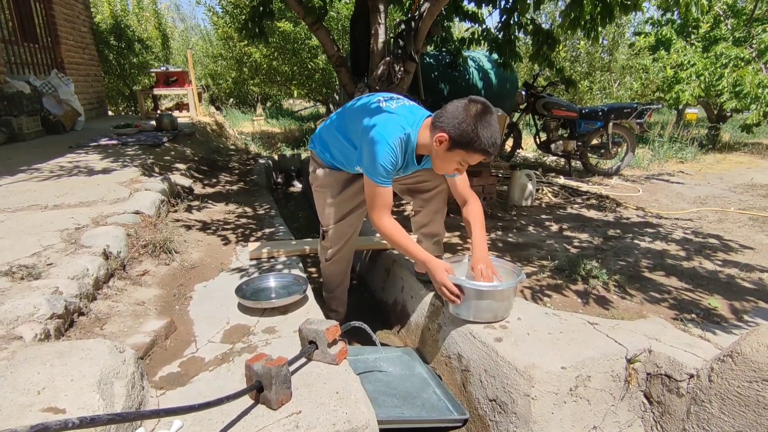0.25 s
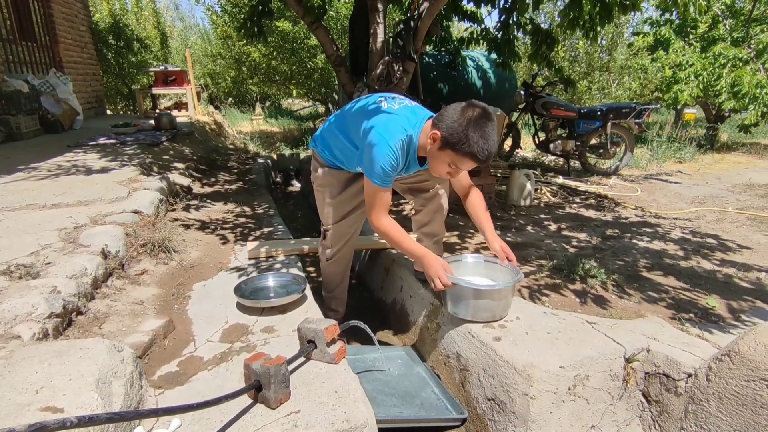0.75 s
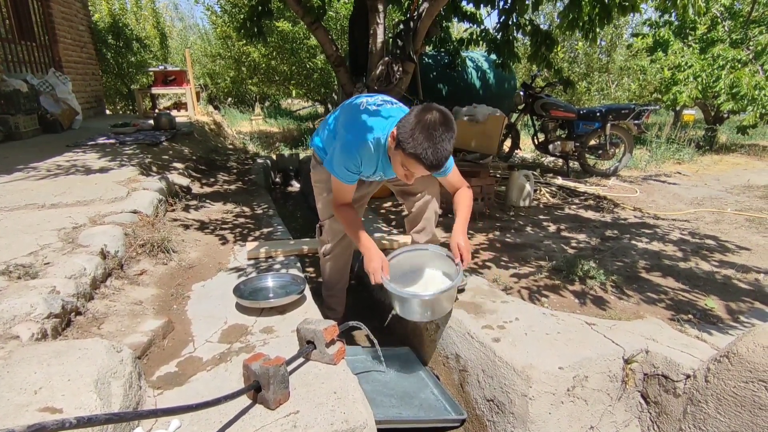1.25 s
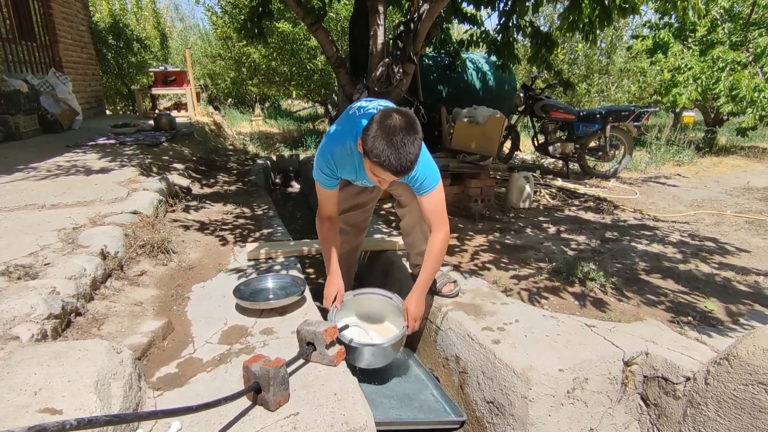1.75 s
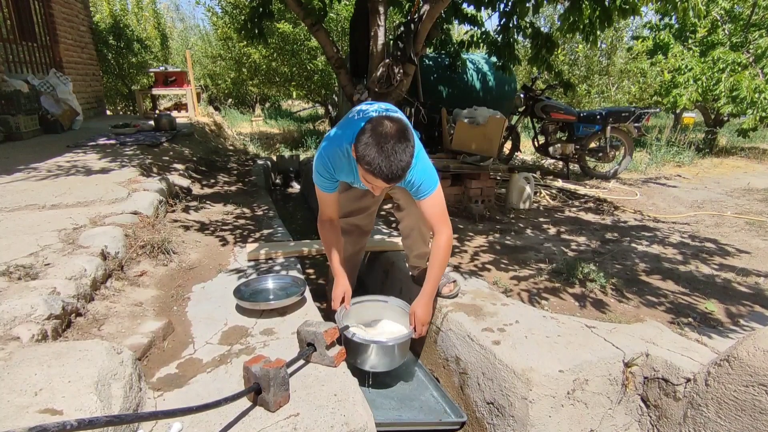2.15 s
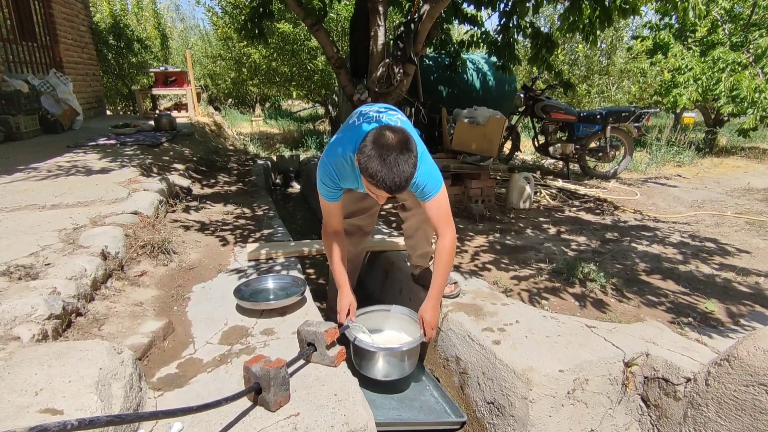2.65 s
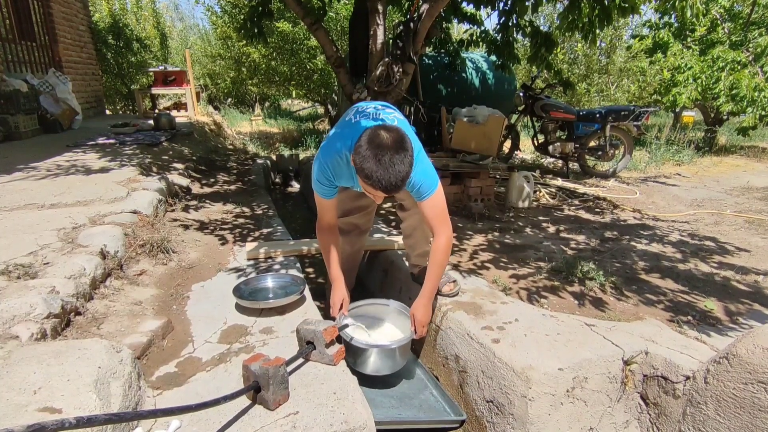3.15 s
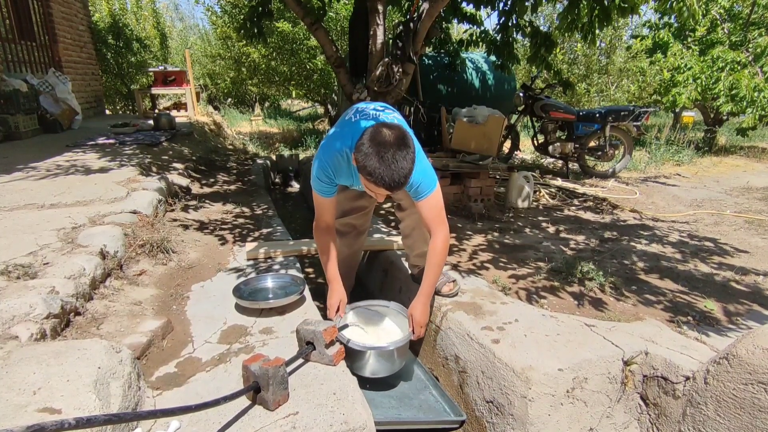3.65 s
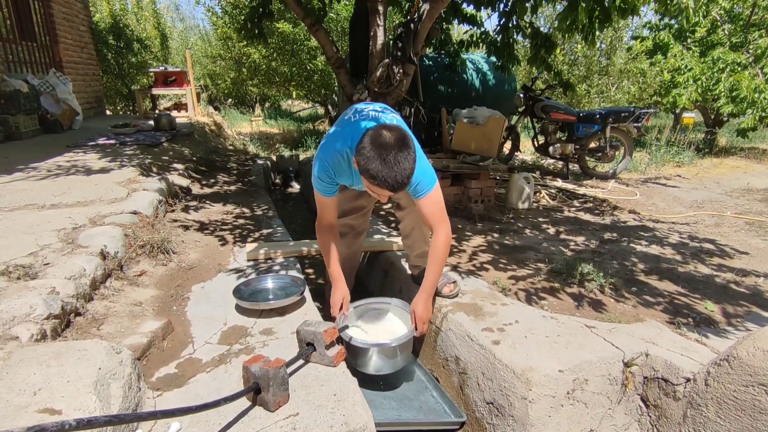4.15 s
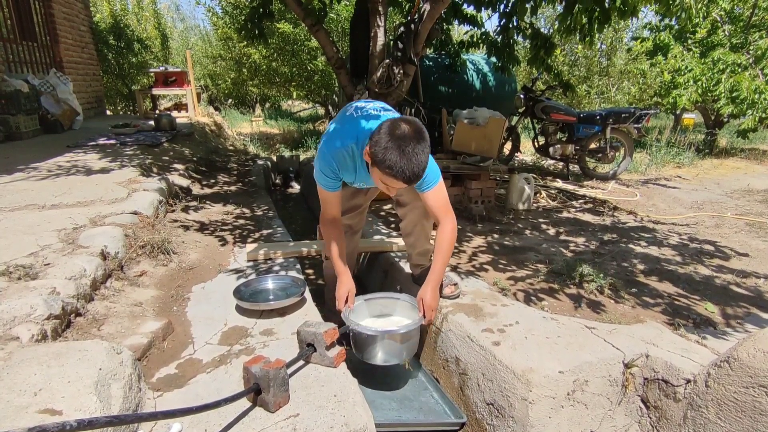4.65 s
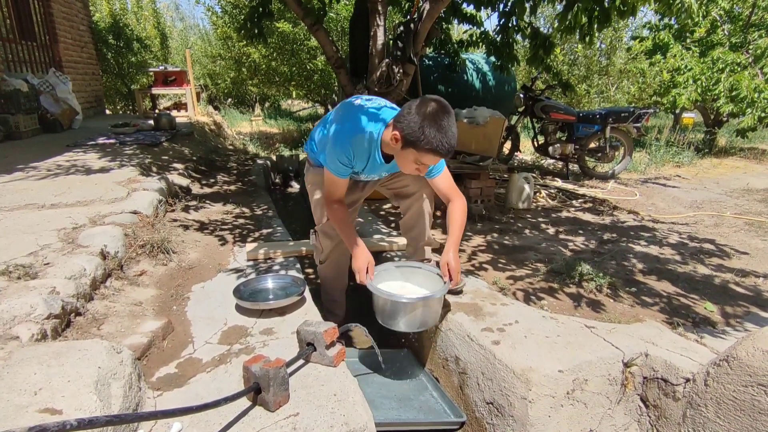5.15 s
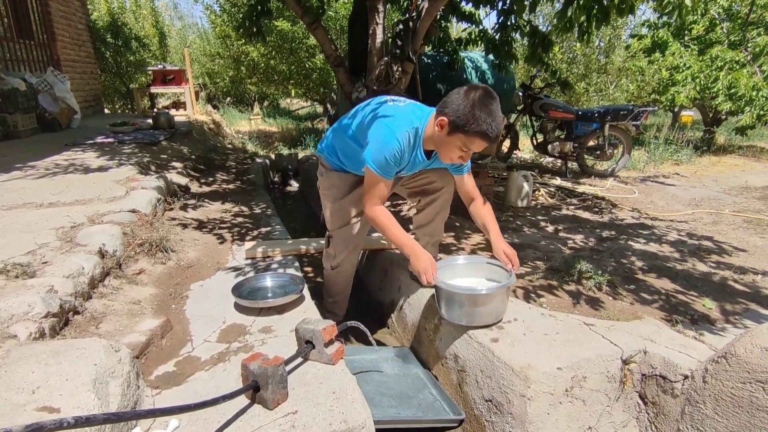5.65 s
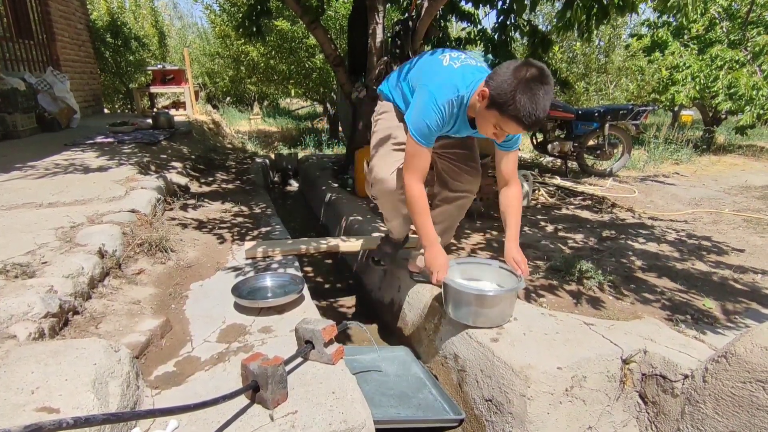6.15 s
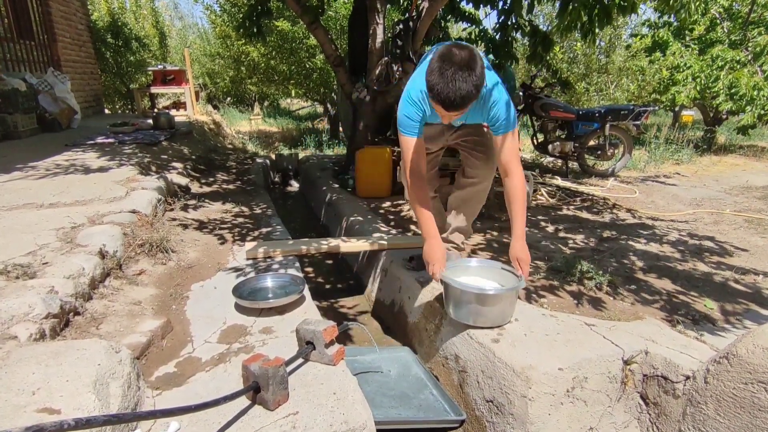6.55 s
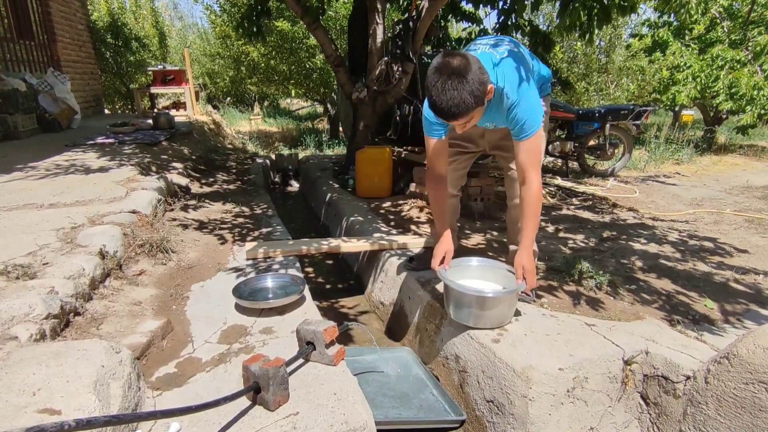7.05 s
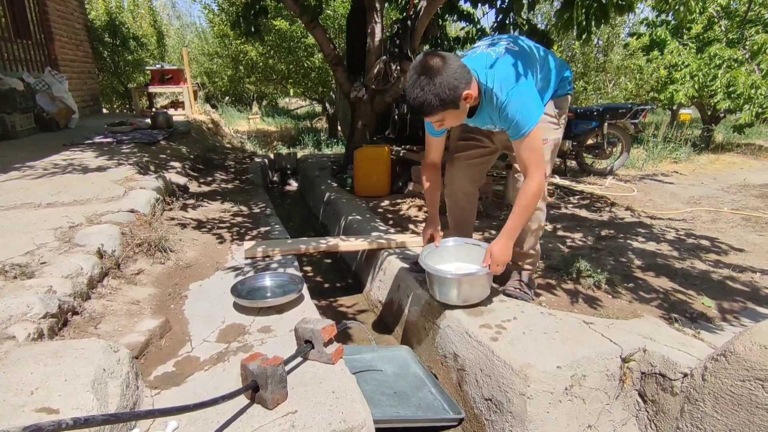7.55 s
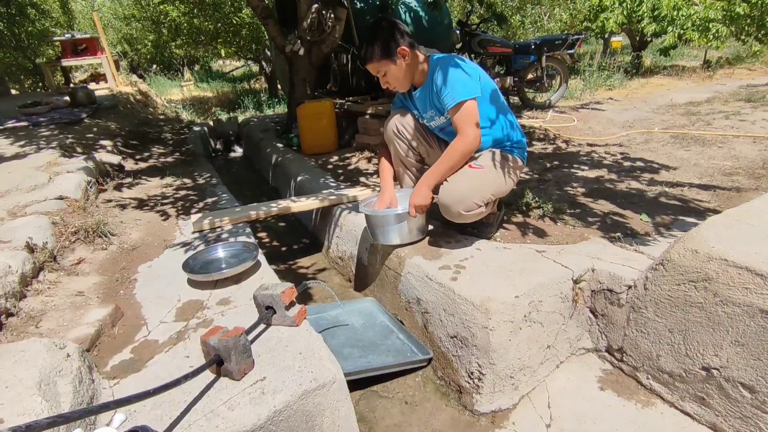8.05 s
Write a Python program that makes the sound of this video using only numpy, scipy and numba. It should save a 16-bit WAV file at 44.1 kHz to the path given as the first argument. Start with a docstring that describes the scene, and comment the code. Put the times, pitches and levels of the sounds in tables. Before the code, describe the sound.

From the start a hose stream splashes into a concrete ditch, a close, bright crackle with low gurgling, scattered splats and fine patter over a faint outdoor drone and hiss. Around 1.7 s the jet is cut for a moment as the pot's rim crosses it, then it falls into the metal pot, with gulps and a more hollow, bubbling tone. Until about 4.8 s it fills steadily, with small sloshes, plops and a rim tick near 3.4 s. The stream thins around 4.9 s, then sharp ticks and splashes at 5.2-5.7 s mark the pot leaving and water returning to the ditch. At 5.8 s the heavy pot scuffs onto stone with a short dull knock; ticks follow at 6.1 and 6.55 s. Water trickles on. At 7.8 s the sound nearly vanishes, then swells back under rumbling pops on the right, a dull left bump near 7.95 s and buffeting air until 8.3 s.

```python
"""Filling a pot under a hose

Outdoors, a hose runs into a concrete ditch while a metal pot of rice is rinsed, filled under the stream and set on stone.
The water is a shower of tiny noisy or ringing grains, with single splats, gulps, patter and sloshes; the pot is a few
damped modes with a scuff and rim ticks. Filtered noise makes the low drone and hiss behind it. Near the end the sound
drops out, then swells back under steps and rumbles on the right, a dull bump on the left and air buffeting the microphone.
"""
import sys
import numpy as np
from scipy import signal
from scipy.fft import rfft, irfft, next_fast_len
from scipy.io import wavfile
from scipy.ndimage import uniform_filter1d
from numba import njit

SR = 44100
rng = np.random.default_rng(int(sys.argv[2]) if len(sys.argv) > 2 else 0)


def unload_audio(sound):
    """Save the sound as a 16-bit wav file, at the path given as the first command line argument."""
    columns = np.transpose(np.atleast_2d(sound))
    # keep every value between -1 and 1, then stretch to whole-number steps
    steps = np.round(np.clip(columns, -1, 1) * 32767)
    wavfile.write(sys.argv[1], SR, steps.astype(np.int16))


N = 365588
TIME = np.arange(N) / SR
TOP_HZ = 14400  # upper edge of the sound


def undb(db):
    """Decibels to gain."""
    return 10 ** (np.asarray(db) / 20)


def curve(rows, axis=1):
    """One column of a table, joined by straight lines in time."""
    rows = np.array(rows)
    return np.interp(TIME, rows[:, 0], rows[:, axis])


def level(x, db):
    """Scale to an rms level."""
    return x * undb(db) / np.sqrt(np.mean(x ** 2))


def fade(t, t60):
    """Exponential ring-down, 60 dB in t60 seconds."""
    return np.exp(-np.log(1000) * t / max(t60, 1e-3))


def add(out, start_s, x):
    """Mix a short sound in at its start time."""
    i = int(start_s * SR)
    out[..., i:i + x.shape[-1]] += x[..., :N - i]


def wander(rate):
    """Random levels, so many a second, smoothly joined."""
    hold = int(SR / rate)
    steps = np.repeat(rng.standard_normal(N // hold + 1), hold)
    return uniform_filter1d(steps, hold)[:N]


def tint(x, colour, modes=()):
    """Filter by a smooth spectrum with resonant bumps on it."""
    size = next_fast_len(x.shape[-1], True)
    f = np.maximum(np.fft.rfftfreq(size, 1 / SR), 1)
    hz, db = np.transpose(colour)
    gain_db = np.interp(np.log(f), np.log(hz), db)
    for centre, width, lift in modes:
        gain_db = gain_db + lift / (1 + (2 * (f - centre) / width) ** 2)
    return irfft(rfft(x, size) * undb(gain_db), size)[..., :x.shape[-1]]


def band(x, lo_hz, hi_hz):
    """Band-pass."""
    edges = [lo_hz, min(hi_hz, SR / 2 - 1000)]
    return signal.sosfilt(signal.butter(2, edges, "band", fs=SR, output="sos"), x)


@njit
def ring(starts, hz, cycles, size, rise):
    """Damped sines that die after so many cycles; a positive rise glides them up as the bubble nears the surface."""
    out = np.zeros(N)
    for k in range(len(starts)):
        length = int(cycles[k] * SR / hz[k]) + 2
        first = int(starts[k] * SR)
        turn = 2 * np.pi * hz[k] / SR
        phasor = size[k] + 0j
        step = np.exp(1j * turn - 6.9 / length)
        glide = np.exp(1j * turn * rise / length)
        for i in range(first, min(first + length, N)):
            phasor *= step
            step *= glide
            out[i] += phasor.imag
    return out


def grains(count, lo_hz, hi_hz, cycles, spread_db, rise):
    """A random shower of ringing grains over a pitch range, the higher ones stronger, with a random spread of sizes."""
    when, pitch, strength, damping = rng.random((count, 4)).T
    hz = lo_hz * (hi_hz / lo_hz) ** pitch
    size = hz * undb(-spread_db * np.log(np.maximum(strength, .01)))
    return level(ring(when * N / SR, hz, cycles * (.5 + damping), size, rise), 0)


def droplets(size, spread_db):
    """Two channels of grainy noise: the strength jumps with every tiny droplet."""
    hold = SR // 2000
    strength = np.clip(rng.standard_normal((2, size // hold + 1)), -2, 2)
    grain = np.repeat(undb(spread_db * strength), hold, axis=1)[:, :size]
    return rng.standard_normal((2, size)) * grain


# Hollow resonances of the ditch. Each row: centre in Hz, width in Hz, full lift in dB.
DITCH_RESONANCES = [(394, 69, 9.5), (731, 183, 12), (890.5, 39, 11.5), (1620, 72, 7.5), (2083, 135, 9),
                    (2595, 400, 7.5), (3180, 75, 7), (5340, 840, 10), (5875, 300, 7.5)]


def hollow(x, share):
    """Lend a sound a share of the ditch's resonances."""
    flat = [(1, 0)]
    return tint(x, flat, [(hz, width, share * lift) for hz, width, lift in DITCH_RESONANCES])


def surroundings(x, wet_db=-2, t60=.09, far_db=-15, far_t60=0.2, shared_hz=850):
    """Concrete close by scatters the sound; the lows reach both ports alike, the highs do not."""
    t = TIME[:SR // 5]
    scatter = rng.standard_normal((3, len(t)))
    low = signal.sosfilt(signal.butter(4, shared_hz, fs=SR, output="sos"), scatter[2])
    high = signal.sosfilt(signal.butter(4, shared_hz, "high", fs=SR, output="sos"), scatter[:2])
    near, far = fade(t, t60), fade(t, far_t60)
    decay = undb(wet_db) * near / np.linalg.norm(near) + undb(far_db) * far / np.linalg.norm(far)
    echo = (low + high) * decay
    # the direct sound reaches the right port first, the left six samples later
    echo[1, 0] += 1
    echo[0, 6] += 1
    return signal.oaconvolve(x[None], echo / np.linalg.norm(echo[0]), axes=1)[:, :N]


# Steady outdoor background. Each row: frequency in Hz, relative level in dB.
AIR_COLOUR = [(20, -0.5), (35, 3), (80, -3.5), (115, -8.5), (200, -14), (400, -4.5), (1000, -35.5),
              (3000, -17.5), (6000, -17), (10000, -28.5), (14500, -26.5)]
# Its drone. Each row: centre in Hz, width in Hz, lift in dB.
DRONE_BUMPS = [(45.1, 1.5, 4.7), (77.9, 27, 7.8), (156.7, 23, 6.8)]
# Air buffeting the microphone. Each row: frequency in Hz, relative level in dB.
BUFFET_COLOUR = [(10, 7), (40, 0), (70, 5), (130, -15), (300, -30), (800, -37), (4000, -80)]


def air(air_db=-55, side_db=-8, buffet_db=-43):
    """Noise shaped into a distant drone under a smooth hiss; gusts buffet the ports from the first pop on."""
    mid, side = rng.standard_normal((2, N))
    # the lows are narrower than the highs
    side = tint(side, [(300, side_db), (1500, 0)])
    steady = tint(np.array([mid + side, mid - side]), AIR_COLOUR, DRONE_BUMPS)
    gusts = level(tint(rng.standard_normal((2, N)), BUFFET_COLOUR), buffet_db)
    return level(steady, air_db) + gusts * (TIME > ZERO_LINE_POPS[0][0])


# Slow sag of the right channel's zero line. Each row: time in seconds, offset in full-scale units.
ZERO_LINE_SAG = [(7.8, 0), (7.87, -.34), (7.94, -.46), (8.05, -.43), (8.2, -.22), (8.29, -.13)]
# Pops, sudden jumps of that line. Each row: start in seconds, step in full-scale units, rise in ms,
# settling in seconds, starting level of the rumble in dB against the step.
ZERO_LINE_POPS = [(7.7998, -0.064, .02, 0.039, -14), (7.8787, .14, 0.0088, .05, -21.5),
                  (7.942, 0.16, 0.016, 0.024, -17.5), (8.0007, 0.1, 0.02, .05, -10.5),
                  (8.0614, 0.049, 0.044, .035, -31)]
# The rumble after a pop. Each row: frequency in Hz, relative level in dB.
RUMBLE_COLOUR = [(10, -6), (40, 0.5), (70, 3), (130, -7), (300, -17.5), (600, -28), (1200, -40),
                 (4000, -72)]


def thump(rumble_t60=0.2, bump_s=7.953, bump_hz=200, bump_db=-36, bump_t60=0.072):
    """The right zero line sags and jumps in steps, each a pop with a rumble after it; a dull bump sounds on the left."""
    left, right, t = np.zeros(N), curve(ZERO_LINE_SAG), TIME[:SR // 2]
    for start_s, step, rise_ms, settle_s, rumble_db in ZERO_LINE_POPS:
        noise = tint(rng.standard_normal(len(t)), RUMBLE_COLOUR)
        rumble = level(noise, rumble_db) * fade(t, rumble_t60)
        front = 1 - np.exp(-t * 1000 / max(rise_ms, .005))
        add(right, start_s, step * front * (np.exp(-t / settle_s) + rumble))
    tone = np.sin(2 * np.pi * bump_hz * t)
    attack = np.minimum(t * bump_hz, 1)
    add(left, bump_s, undb(bump_db) * tone * attack * fade(t, bump_t60))
    return np.array([left, right])


# The filled pot meeting the ledge. Each row: mode in Hz, relative level in dB, t60 in seconds.
POT_BODY = [(274, -6, 0.03), (553, 1.5, 0.058), (790, 7, 0.013), (1036, 0, 0.04), (1310, -10, 0.022)]
# Sharp ticks on the pot's rim. Each row: start in seconds, peak on the right in dB, lowest frequency in Hz.
TICKS = [(3.409, -27, 300), (5.168, -22.5, 450), (5.2453, -23, 2960), (6.087, -23, 2480),
         (6.554, -30, 1500)]


def pot(knock_s=5.7935, knock_db=-30, scuff_t60=0.075, grit_db=-2, rub_db=-6, contact_s=0.0032):
    """The rim ticks as the pot is handled; damped by its water, it scuffs down on the stone with a dull knock."""
    knock, tick, t = np.zeros(N), np.zeros(N), TIME[:SR // 5]
    body = sum(undb(db) * np.sin(2 * np.pi * hz * t) * fade(t, t60) for hz, db, t60 in POT_BODY)
    scuff = rng.standard_normal(len(t)) * fade(t, scuff_t60)
    # the scuff also sets the pot's own modes ringing
    rubbed = band(signal.fftconvolve(scuff, body)[:len(t)], 230, 4000)
    blow = level(body * (1 - np.exp(-t / contact_s)), 0)
    blow = blow + level(rubbed, rub_db) + level(band(scuff, 260, 1330), grit_db)
    add(knock, knock_s, blow / abs(blow).max() * undb(knock_db))
    for start_s, db, lowest_hz in TICKS:
        snap = band(fade(t, .0002), lowest_hz, 14300)
        add(tick, start_s, snap / abs(snap).max() * undb(db))
    # the ticks are weaker on the left
    return surroundings(knock, wet_db=-12, t60=0.29) + tick * undb([[-9], [0]])


# Water sloshing in the moving pot. Each row: start in seconds, length before the release in seconds,
# bubble level in dB and wash level in dB, both before trim, wash's first pitch in Hz, its spread in octaves.
SLOSH_WAVES = [(1.81, 0.08, -58.5, -52, 1960, 0.59), (1.969, 0.045, -60, -56, 1050, 0.33),
               (2.505, 0.053, -60, -55.5, 2420, 0.41), (2.976, 0.157, -80, -52, 2970, 0.18),
               (3.358, 0.023, -57, -63, 1500, 0.59), (3.535, 0.058, -64, -54.5, 2310, 0.24),
               (3.684, 0.058, -57, -52.5, 2430, 0.2), (3.92, .04, -59, -69, 2380, 0.47),
               (4.058, 0.17, -77, -52, 4040, 0.74), (4.289, .06, -67, -59, 1200, 0.4),
               (4.767, 0.023, -80, -45.5, 3300, 0.83), (4.951, 0.038, -61, -54.5, 2030, 0.95),
               (5.347, 0.045, -58, -58, 1020, 0.67), (5.452, 0.143, -58, -59, 1110, 0.52),
               (5.739, .045, -57, -55, 2500, 0.34), (5.848, 0.02, -55, -51, 1000, 0.36)]
SLOSH_ATTACK_S, SLOSH_RELEASE_T60_S = 0.0053, 0.074


def sloshes(bubble_db=-2, wash_db=-1, wash_cycles=30, spread_db=5, fall_octaves_per_s=4):
    """A wave runs up the pot's wall: it folds bubbles under and breaks in a grainy wash that sinks in pitch."""
    folding, breaking = np.zeros(N), np.zeros(N)
    t = TIME[:SR // 3]
    for start_s, length, low_db, high_db, hz, octaves in SLOSH_WAVES:
        attack = np.minimum(t / max(SLOSH_ATTACK_S, 1e-3), 1)
        shape = attack * fade(np.maximum(t - length, 0), SLOSH_RELEASE_T60_S)
        add(folding, start_s, shape * undb(low_db))
        when = t[-1] * rng.random(size=400)
        pitch, strength = rng.standard_normal((2, len(when)))
        droplet_hz = np.minimum(hz * 2 ** (octaves * pitch - fall_octaves_per_s * when), TOP_HZ)
        size = np.sqrt(droplet_hz / hz) * undb(spread_db * np.tanh(strength))
        wash = ring(when, droplet_hz, np.full(len(when), float(wash_cycles)), size, 0.)
        add(breaking, start_s, shape * level(wash[:len(t)], high_db + wash_db))
    bubbles = grains(count=1300, lo_hz=300, hi_hz=1140, cycles=27, spread_db=-1.5, rise=0.1)
    folded = folding * level(tint(bubbles, POT_WATER_COLOUR, POT_RESONANCES), bubble_db)
    return surroundings(folded + breaking, wet_db=3.0, t60=0.069)


# Pockets of air closing under water. Each row: start in seconds, size in dB before trim,
# starting pitch in Hz, t60 in seconds.
AIR_POCKETS = [(.482, -46, 707, .035), (1.263, -46, 1120, .04), (1.815, -50.5, 450, 0.12),
               (1.823, -40, 1810, .03), (1.878, -47, 740, 0.042), (1.972, -56, 760, .025),
               (1.985, -46.5, 880, 0.036), (2.082, -52, 656, 0.036), (2.143, -48, 625, 0.039),
               (3.055, -50, 2050, .025), (3.072, -45, 1770, 0.035), (3.279, -60, 330, 0.026),
               (3.321, -44, 363, 0.043), (3.359, -44.5, 1780, .035), (3.372, -49, 420, 0.028),
               (3.752, -49, 430, .04), (3.977, -50, 795, .03), (4.196, -53, 1760, .035),
               (4.234, -49, 640, 0.02), (4.242, -44, 1760, 0.041), (4.275, -51, 410, 0.052),
               (4.314, -47.5, 711, 0.069), (4.334, -50.5, 675, .03), (4.359, -53, 477, 0.11),
               (5.353, -47, 424, .06), (5.377, -49, 373, 0.099), (5.462, -44.5, 1010, .03),
               (5.483, -44, 1500, 0.035), (5.543, -49, 860, 0.09), (6.227, -53, 780, .04),
               (6.597, -39, 1410, 0.023), (6.676, -46, 762, 0.036)]


def gulps(gain_db=4, rise=0.1, brood_db=-10, brood_s=0.026, brood_cycles=9):
    """One large bubble rings and breaks up into a brood of short-lived others."""
    start_s, db, hz, t60 = np.transpose(AIR_POCKETS)
    out = ring(start_s, hz, hz * t60, undb(db), rise)
    delay, pitch = rng.random((len(start_s), 7, 2)).T  # seven in each brood
    cycles = np.full(len(start_s), float(brood_cycles))
    for lag, ratio in zip(delay, 2 ** (1.6 * pitch - .5)):
        out += ring(start_s + brood_s * lag ** 2, hz * ratio, cycles, undb(db + brood_db), rise)
    return surroundings(out * undb(gain_db), wet_db=-3.0, t60=0.036)


# Single drops slapping down. Each row: start in seconds, level in dB before panning, centre in Hz,
# t60 in seconds, spread either side in octaves.
SPLAT_DROPS = [(0.037, -40.5, 5370, 0.018, 0.56), (0.19, -41, 1600, 0.054, 0.22),
               (.303, -47, 1870, 0.14, 0.57), (0.3568, -35, 5200, 0.027, 0.085),
               (.39, -36.5, 5570, 0.032, 0.35), (0.7024, -39, 3100, 0.05, .3), (0.771, -43, 2180, 0.05, .2),
               (0.833, -45, 6400, .025, .35), (.87, -44, 5070, .02, 0.15), (0.928, -40.5, 3150, 0.071, .2),
               (.966, -41, 2600, 0.075, 1), (1.012, -42.5, 2110, .025, 0.37),
               (1.1764, -38.5, 5840, 0.028, 0.43), (1.221, -44, 2500, 0.043, 0.4),
               (1.312, -44, 2280, .03, 0.17), (1.403, -55, 1500, .04, .6), (1.449, -51, 4600, .03, .5),
               (1.749, -43, 5740, .025, 0.13), (1.971, -45, 5800, 0.015, 0.43),
               (2.107, -50, 4200, 0.056, .9), (2.186, -46.5, 2140, 0.045, 0.48),
               (2.301, -46, 2080, .035, 0.24), (2.364, -49.5, 1510, 0.038, 0.36),
               (2.53, -47, 2540, .03, 0.55), (2.967, -47, 2820, .035, .15), (2.985, -47, 4220, .025, 0.11),
               (3.401, -49, 1360, .03, 0.59), (3.927, -47, 1860, .035, .55),
               (3.945, -45, 4620, 0.018, 0.13), (4.918, -42, 6030, 0.0071, 0.72),
               (5.076, -43, 5400, .022, 0.42), (5.197, -36, 4960, 0.015, 0.15),
               (5.212, -43, 3400, 0.014, 0.4), (5.246, -38.5, 1594, 0.053, 0.25),
               (5.314, -42, 4300, 0.046, 0.5), (5.322, -40, 3060, 0.058, .25),
               (5.407, -45.5, 6800, .025, 0.24), (5.427, -34.5, 3650, 0.039, 0.51),
               (5.61, -42, 5600, 0.044, 0.63), (5.648, -43, 6130, .03, 0.4),
               (5.714, -32, 3190, 0.028, 0.54), (5.744, -42, 2420, .035, 0.18),
               (6.086, -28.5, 5870, 0.021, 0.35), (6.19, -50, 2250, .035, .2),
               (6.279, -50, 1720, 0.039, .5), (6.445, -43, 3180, .025, 0.24),
               (6.555, -42, 4430, .035, 0.81), (6.615, -41, 3900, 0.067, 0.72), (6.698, -45, 5500, .03, .3),
               (6.725, -54, 3500, .03, 1.1), (6.822, -47, 5200, .05, .45),
               (7.0205, -37, 6000, 0.0086, 0.49), (7.28, -45, 2330, 0.054, .25),
               (7.293, -41, 3200, 0.027, 0.54), (7.3505, -43, 2580, 0.042, 1.3),
               (7.42, -35, 6500, 0.029, 0.51), (7.479, -48, 2300, .03, .25), (7.552, -45, 2800, .035, .8),
               (7.564, -41.5, 1880, .05, 0.85), (7.62, -44, 5100, 0.024, 0.32),
               (7.715, -45, 3280, .04, 1.3), (7.917, -39, 5200, 0.027, 0.35)]
# bright drops land further left, low ones further right
SPLAT_HZ, SPLAT_PAN_DB_PER_OCTAVE = 3600, 1.5
SPLAT_GRAIN_DB = 4


def splats(gain_db=0, spatter_db=-22, spatter_t60=0.37, skirt_db=-17, ping_db=-1, ping_cycles=45,
           bounce_s=0.0036, bounce_db=-7, hollow_share=0.75):
    """Each drop slaps down on water or wet concrete, pings a tiny bubble and throws a short spatter of droplets."""
    out, t = np.zeros((2, N)), TIME[:SR // 6]
    attack = 1 - np.exp(-t / .0005)
    for start_s, db, hz, t60, octaves in SPLAT_DROPS:
        breadth = 2 ** max(octaves, .1)
        pan_db = SPLAT_PAN_DB_PER_OCTAVE * np.log2(hz / SPLAT_HZ)
        gain = undb(db + gain_db + np.array([[pan_db], [-pan_db]]) / 2)
        noise = hollow(droplets(len(t), SPLAT_GRAIN_DB), hollow_share)
        shape = attack * (fade(t, t60) + undb(spatter_db) * fade(t, spatter_t60))
        core = level(band(noise, hz / breadth, hz * breadth), 0)
        slap = shape * (core + level(band(noise, 1100, 4600), skirt_db))
        # the drop's energy is set by its size, whatever its fine grain
        slap = slap * np.linalg.norm(shape / shape.max()) / np.linalg.norm(slap, axis=1, keepdims=True)
        ping = undb(ping_db) * np.sin(2 * np.pi * hz * t) * fade(t, ping_cycles / hz)
        add(out, start_s, gain * (slap + ping))
        # the ditch wall throws the ping back
        add(out, start_s + bounce_s, gain * ping * undb(bounce_db))
    return out


# Small pattering drops. Each row: centre in Hz, level in dB against the spray curve, before trim.
PATTER_BANDS = [(1000, -13), (1550, -8), (2300, -5), (3200, -8), (5600, -12)]


def patter(breadth=1.296, per_s=17, t60=0.049, spread_db=4.0, in_pot_db=-7, grain_db=3.5,
           hollow_share=0.57, gain_db=-1):
    """Small drops break off the jet and patter down in the ditch in short gritty bursts; the pot catches most of them."""
    out, t, count = np.zeros((2, N)), TIME[:SR // 8], int(per_s * N / SR)
    breadth = max(breadth, 1.1)
    grit = hollow(droplets(N, grain_db), hollow_share)
    for hz, db in PATTER_BANDS:
        slip, strength = rng.random((count, 2)).T
        # the jet sheds drops at a fairly even rate, so they seldom pile up
        when = (np.arange(count) + slip) / count
        energy = undb(spread_db * (2 * strength - 1)) ** 2
        hits = np.bincount((when * N).astype(int), energy, N)
        bursts = np.sqrt(abs(signal.oaconvolve(hits, fade(t, t60) ** 2)[:N]))
        out += level(bursts * band(grit, hz / breadth, hz * breadth), db + gain_db)
    return out * undb(curve(STREAM_FLOW, axis=1) + in_pot_db * curve(STREAM_AIM))


# The stream, with a lull each time the pot's rim crosses it. Each row: time in seconds,
# spray level in dB and gurgle level in dB, both before trim and colour.
STREAM_FLOW = [(0, -57.5, -55), (0.85, -55.5, -61), (1.4, -58.5, -53.5), (1.675, -54, -67),
               (1.70, -65.5, -79), (1.79, -54.5, -78), (1.87, -55.5, -54.5), (2.23, -53.5, -59.5),
               (2.45, -57, -58), (3.2, -55, -56.5), (4.1, -56, -52.5), (4.68, -58, -54.5),
               (4.88, -64.5, -73), (5.0, -61.5, -62), (5.21, -59, -71), (5.3, -55, -65), (5.58, -55, -56.5),
               (5.98, -57.5, -63.5), (6.2, -56.5, -59.5), (7.6, -56.5, -57.5), (8.29, -59.5, -62)]
# Where the stream lands. Each row: time in seconds, share that falls into the pot from 0 to 1.
STREAM_AIM = [(1.66, 0), (1.8, 1), (4.8, 1), (5.2, .4), (5.4, 0)]
# Colour of the water in the ditch, then in the pot. Each row: frequency in Hz, gain in dB.
DITCH_WATER_COLOUR = [(150, -8), (300, -3.5), (550, -13.5), (1100, -2.5), (2400, 1.5), (4000, -0.5),
                      (6000, -7), (8000, -1), (10500, -5.5), (14500, -9)]
POT_WATER_COLOUR = [(150, -9), (300, -9), (550, -19.5), (1250, -7.5), (2400, -2.5), (4000, -6.5),
                    (6000, -10), (8000, -6.5), (10500, -8), (14500, -12)]
# Hollow resonances of the pot. Each row: centre in Hz, width in Hz, lift in dB.
POT_RESONANCES = [(368, 77, 8.3), (676, 400, 12.5), (1256, 46, -5), (1778, 52, 10.5), (2170, 90, 5),
                  (2550, 120, 4.5), (2820, 60, 6), (4700, 1450, 8)]


def stream(spray_db=5.0, gurgle_db=-1, pot_db=0, fizz_db=-3):
    """The hose jet crackles on the surface and drives bubbles under, in the ditch or in the pot."""
    spray, gurgle = 0, 0
    # the jet scatters over five spots, each with its own reflections and its own sputter
    for spot in range(5):
        sputter = undb(3.5 * wander(45))
        crackle = sputter * grains(count=4000, lo_hz=1010, hi_hz=15300, cycles=3.5, spread_db=4.0, rise=0.)
        fizz = grains(count=280, lo_hz=974, hi_hz=7260, cycles=53, spread_db=2.0, rise=0.17)
        bubbles = grains(count=600, lo_hz=198.6, hi_hz=1700, cycles=17, spread_db=2.0, rise=0.23)
        spray = spray + surroundings(crackle + undb(fizz_db) * fizz, wet_db=10.5, t60=0.12)
        gurgle = gurgle + surroundings(bubbles, wet_db=-5.5, t60=0.083)
    top = level(spray, spray_db) * undb(curve(STREAM_FLOW, axis=1))
    bottom = level(gurgle, gurgle_db) * undb(curve(STREAM_FLOW, axis=2))
    water = top + bottom
    # the landing share splits the water's power between ditch and pot
    in_pot = np.clip(curve(STREAM_AIM), 0, 1)
    in_ditch = np.sqrt(1 - in_pot) * tint(water, DITCH_WATER_COLOUR, DITCH_RESONANCES)
    return in_ditch + np.sqrt(in_pot) * undb(pot_db) * tint(water, POT_WATER_COLOUR, POT_RESONANCES)


def scene():
    """Open air, pot and water."""
    return air() + pot() + sloshes() + gulps() + splats() + patter() + stream()


# The two microphone ports. Each row: frequency in Hz, gain in dB.
LEFT_PORT_COLOUR = [(100, 2.5), (380, -0.16), (700, 2), (1500, -4.5), (4000, -5), (6500, -5), (8300, 0),
                    (9600, -3), (10800, -8.5), (12000, 1.5), (14500, -4.5)]
RIGHT_PORT_COLOUR = [(100, 1.9), (380, -2.5), (700, 2.5), (1500, -1.5), (4000, -1), (6000, -3), (7300, -3),
                     (8200, -23), (8900, -3.5), (9500, -2), (12000, 3.5), (14500, 2)]
# The brief dropout. Each row: time in seconds, gain in dB.
DROPOUT_GAIN = [(7.779, 0), (7.783, -30), (7.797, -30), (7.802, -19), (7.83, -13), (7.91, -6), (8.02, -1),
                (8.2, 0)]


def record(dry):
    """Each port colours the sound; it drops out and swells back, the thump joins it, and the top is cut."""
    ports = np.array([tint(dry[0], LEFT_PORT_COLOUR), tint(dry[1], RIGHT_PORT_COLOUR)])
    heard = ports * undb(curve(DROPOUT_GAIN)) + thump()
    return signal.sosfilt(signal.ellip(10, .2, 70, TOP_HZ, fs=SR, output="sos"), heard)


dry = scene()
out = record(dry)
unload_audio(out)
```